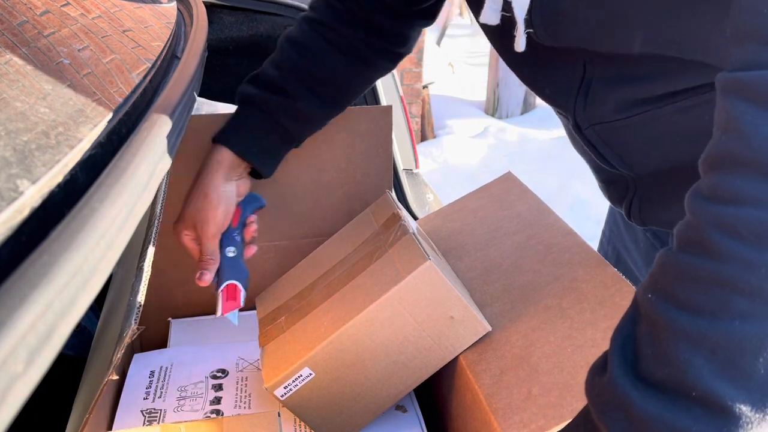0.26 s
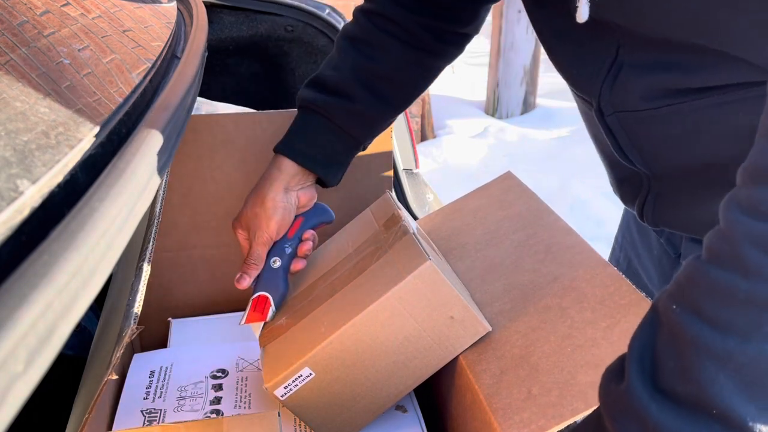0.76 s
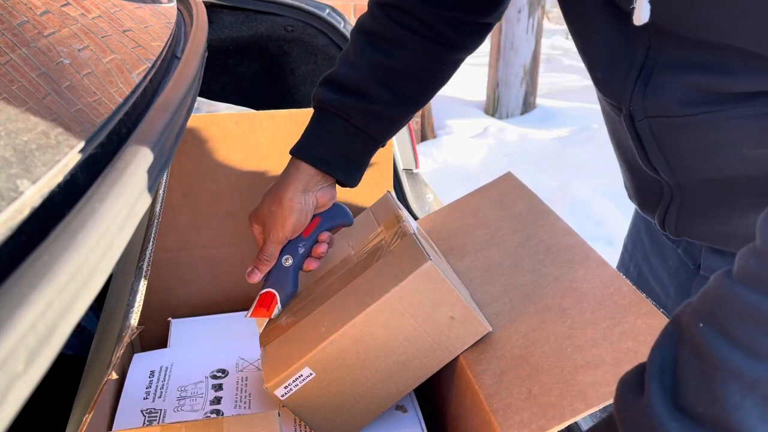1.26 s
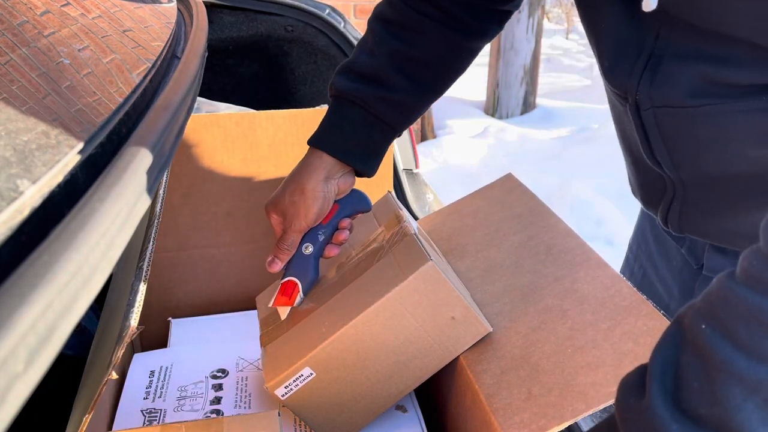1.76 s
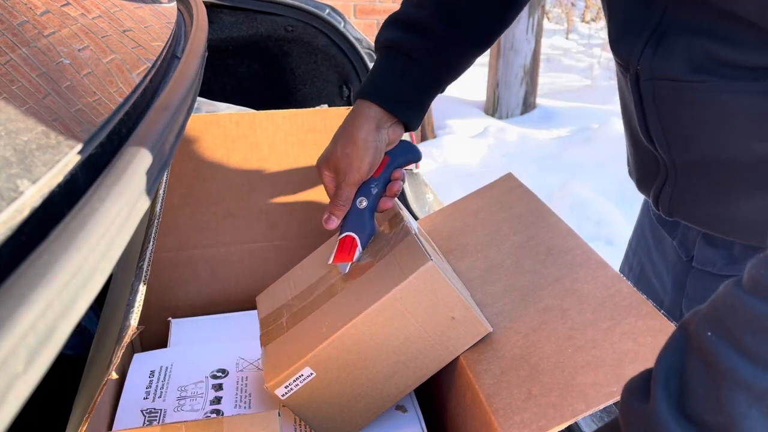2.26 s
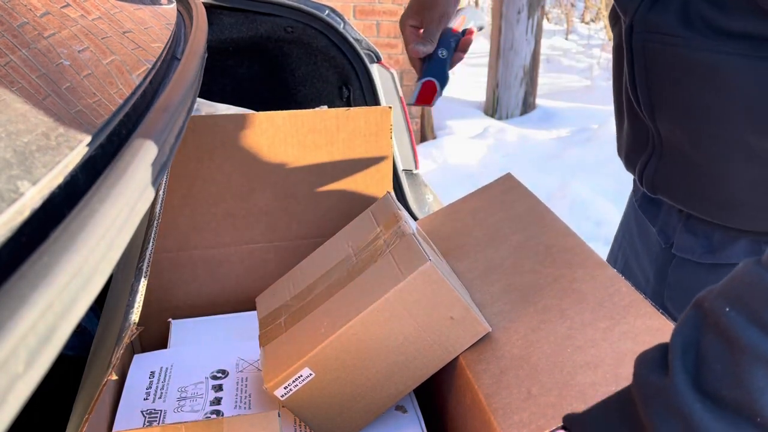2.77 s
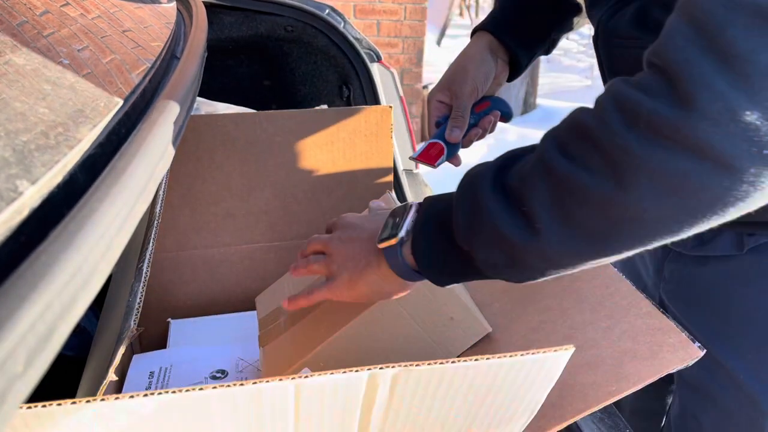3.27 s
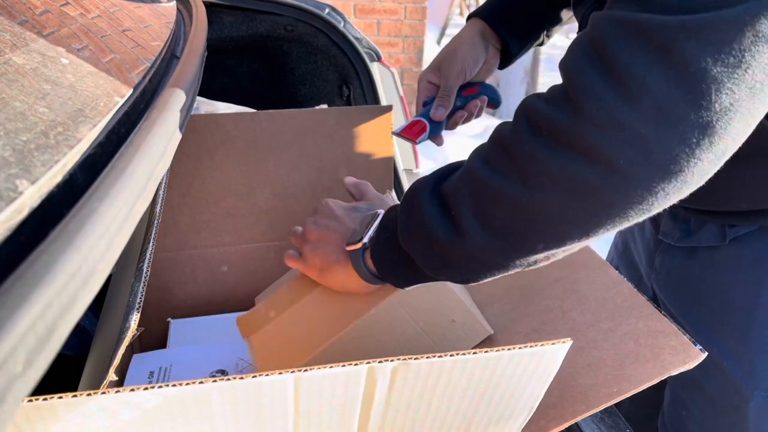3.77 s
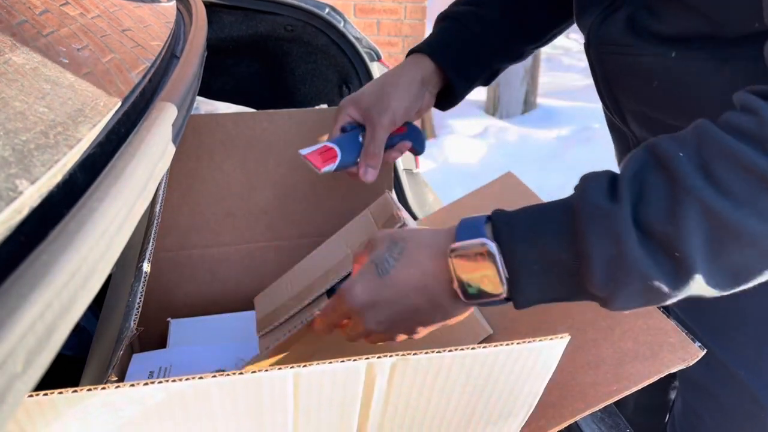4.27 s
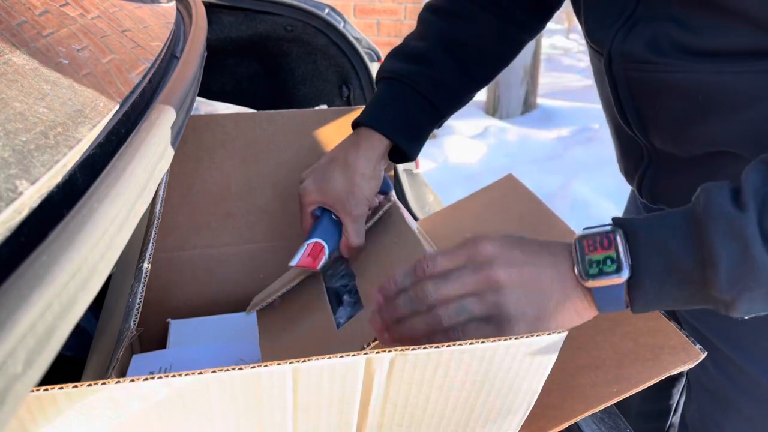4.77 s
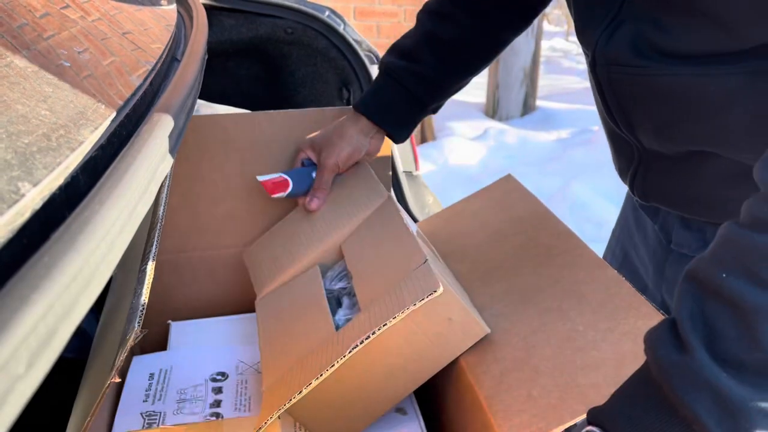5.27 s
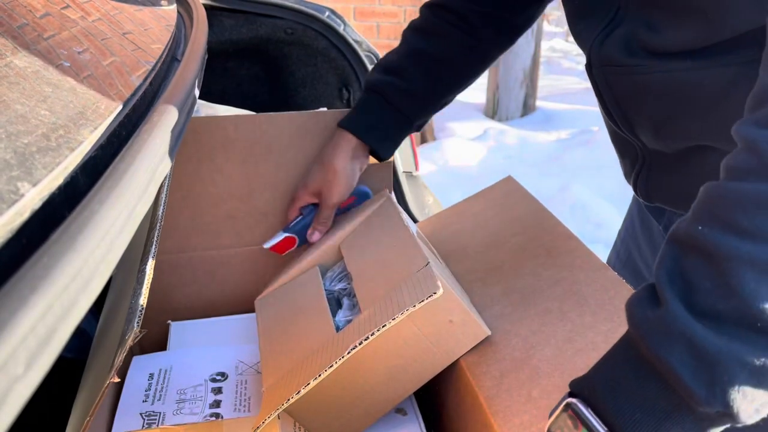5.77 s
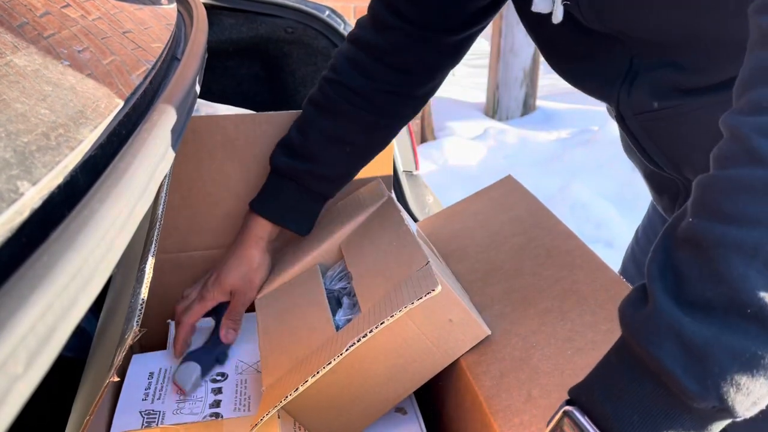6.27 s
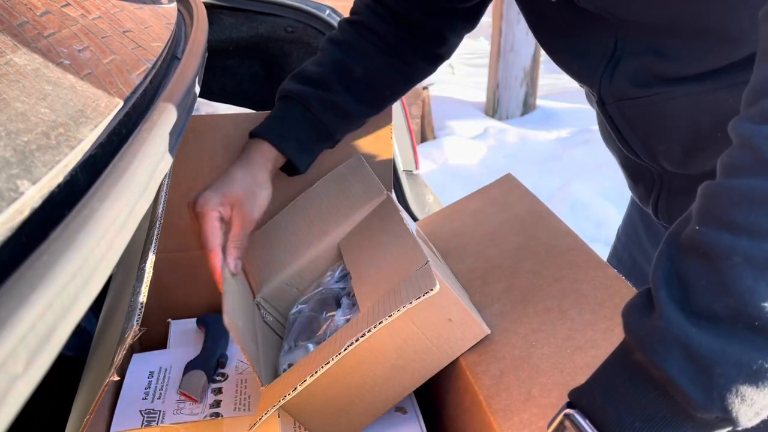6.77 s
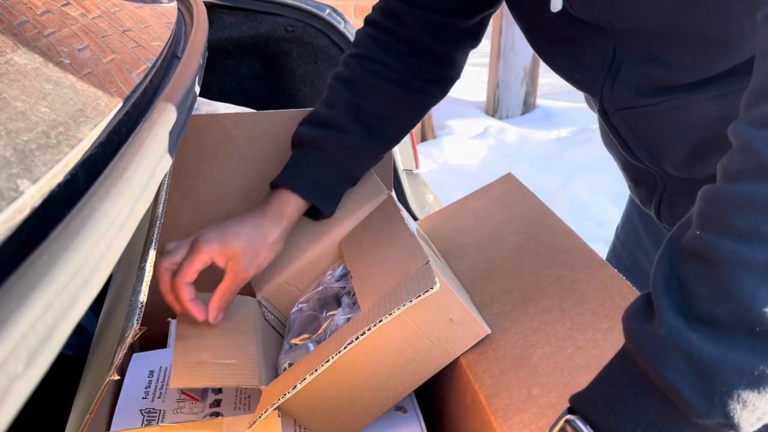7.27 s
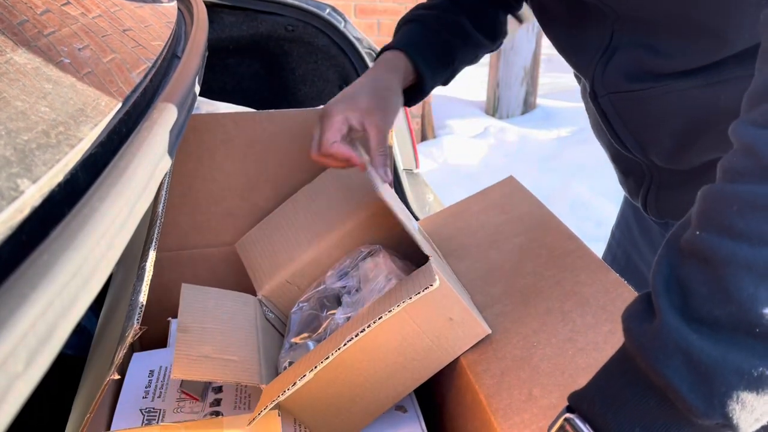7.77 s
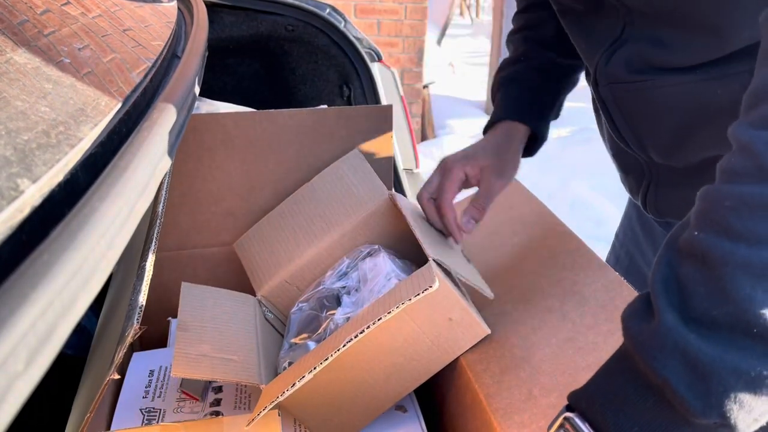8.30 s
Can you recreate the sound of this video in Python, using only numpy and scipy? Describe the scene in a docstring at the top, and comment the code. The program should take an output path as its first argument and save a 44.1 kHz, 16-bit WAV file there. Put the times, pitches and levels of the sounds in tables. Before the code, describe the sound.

Close up in an open car boot on a still day, a utility knife quietly bites, then rasps through box tape with growing crackles, falling off the end in a loud hollow thump. The blade clacks back into its handle. Hands brush the board, tape snaps, flaps pop and creak, the knife is set down with a deep knock, and remaining flaps crack open.

```python
"""A utility knife slits the tape of a cardboard box in an open car boot, heard close by on a still day outdoors.
The blade rasps along the seam and drops off the end with a thump: fibres tear, and blows ring the panels.
Hands rub the board, the blade clacks back into its handle, and the flaps fold back with creaks and cracks.
Noise bursts make the friction and cracks, decaying modes the blows, gliding tones the judders and zips.
Boot walls scatter the handling to both sides, over quiet air, into a pair of resonant microphone ports."""
import sys
import numpy as np
from scipy import signal
from scipy.fft import rfft, irfft, next_fast_len
from scipy.io import wavfile
from scipy.ndimage import uniform_filter1d

SR = 44100
rng = np.random.default_rng(int(sys.argv[2]) if len(sys.argv) > 2 else 0)


def put_to_file(sound):
    """Save the sound as 16-bit audio at rate SR, in the file named by the first command-line argument."""
    columns = np.atleast_2d(sound).T  # one column per channel
    safe = np.clip(columns, -1, 1)
    whole_steps = np.round(safe * 32767)
    wavfile.write(sys.argv[1], SR, whole_steps.astype(np.int16))


N = 376613
TIME = np.arange(N) / SR
CUTOFF_HZ = 16200  # top of what the microphones pass

# Blows on the box. Each row: time in s, level in dB, hard-contact share in dB,
# pitch of the struck spot in Hz, panel ring in dB (low where a hand damps it).
KNOCKS = [(.068, -21, -8.5, 165, -14), (0.333, -43.5, -28, 83, 14), (0.547, -40, 1.5, 146, -2),
          (1.743, -25.5, 1.5, 390, -19), (2.4819, -1.5, -10.5, 163, -4), (2.535, -32.5, -24, 76, -3.5),
          (3.316, -22.5, 0.5, 231, -15), (3.5, -27.5, 1.5, 268, -1), (3.66, -29, 5.5, 323, -8),
          (3.824, -28.5, -4.5, 469, -6), (4.002, -33.5, 6.5, 636, 3), (4.271, -35, -3.5, 126, 1),
          (4.527, -29.5, -17, 462, 10), (4.564, -7.5, -2, 302, 1), (4.576, -17.5, -4, 273, 1),
          (4.698, -31.5, -9, 150, -6), (4.786, -40, -16, 220, 3), (4.904, -37, -12, 330, 5),
          (4.999, -33.5, 3, 281, 0), (5.056, -19.5, -10, 340, -4), (5.09, -21, -22, 140, -8),
          (5.11, -19, -9.5, 172, -3), (5.221, -26.5, -11.5, 141, -1), (5.306, -26.5, -25, 453, -14),
          (5.368, -23.5, -26, 378, -11), (5.525, -37.5, -8, 107.4, -4), (5.679, -24, -25, 298, -3),
          (5.826, -24, 7, 540, -9), (5.843, -27, -20, 295, 15), (5.945, -19.5, 0, 120.5, -11),
          (6.04, -31, -2, 455, -6), (6.2324, -19.5, 11, 601, -1), (6.241, -28, 5, 650, -6),
          (6.243, -3.5, -33, 146, 0), (6.306, -6.5, -5, 227, -8), (6.32, -19, -32.5, 84.7, 6),
          (6.426, -18.5, 2, 164, 8), (6.491, -39, 8, 693, 7), (6.506, -20.5, -11, 127, -16),
          (6.529, -26, 3.5, 108, -22), (6.598, -37, 4, 600, 5), (7.042, -27, 1.5, 131.6, 3.5),
          (7.465, -21.5, 4, 857, 8), (7.556, -26, -1, 187, -12), (8.13, -13.5, -3.5, 279, -6)]
# Paper fibres giving way. Each row: frequency in Hz, relative level in dB.
CRACK_PAPER = [(1000, -10.5), (1900, -7), (2900, -0.5), (4500, -9), (7000, -20.5)]


def amp(db):
    """Decibels to gain."""
    return 10 ** (np.asarray(db) / 20)


def rms_one(x):
    """Scale to unit rms."""
    return x / np.sqrt(np.mean(x ** 2) + 1e-20)


def in_time(rows):
    """The columns of a curve at every sample."""
    s, *columns = np.transpose(rows)
    return [np.interp(TIME, s, column) for column in columns]


def during(rows):
    """One while a curve lasts, with short fades."""
    inside = (TIME >= rows[0][0]) & (TIME <= rows[-1][0])
    return uniform_filter1d(1. * inside, size=400)


def at_hz(points, hz, axis=1):
    """Read a column of a spectrum on a log-frequency axis."""
    points = np.array(points)
    return np.interp(np.log(hz + 1), np.log(points[:, 0]), points[:, axis])


def colour(x, spectrum):
    """Filter by a smooth spectrum."""
    size = next_fast_len(len(x))
    gain = amp(at_hz(spectrum, np.fft.rfftfreq(size, 1 / SR)))
    return irfft(rfft(x, size) * gain, size)[:len(x)]


def band(x, low_hz, high_hz):
    """Causal band-pass."""
    return signal.sosfilt(signal.butter(2, [low_hz, high_hz], "band", fs=SR, output="sos"), x)


def resonate(x, hz, q):
    """What passes through one resonance."""
    return signal.lfilter(*signal.iirpeak(hz, q, fs=SR), x + 1e-18)


def drift(rate):
    """Random wander through `rate` points a second, of spread one, kept within two spreads."""
    return np.clip(rms_one(np.interp(TIME * rate, np.arange(4000), rng.standard_normal(4000))), -2, 2)


def swell(peak_s, rise_s, fall_s):
    """Gain of a movement that gathers speed and dies away, 20 dB down one rise before and one fall after."""
    gain = np.zeros(N)
    near = slice(*np.searchsorted(TIME, [peak_s - 3 * rise_s, peak_s + 3 * fall_s]))
    away = np.maximum((peak_s - TIME[near]) / rise_s, (TIME[near] - peak_s) / fall_s)
    gain[near] = amp(-20 * away ** 1.51)
    return gain


def add(out, s, sound):
    """Mix a sound in at a time."""
    start = max(round(s * SR), 0)
    out[start:start + len(sound)] += sound[:N - start]


def bend(x, lag):
    """Bending waves in board travel as the root of frequency: lows arrive late (lag in s at 1 kHz)."""
    hz = np.fft.rfftfreq(len(x), 1 / SR)
    return irfft(rfft(x) * np.exp(-4j * np.pi * lag * np.sqrt(1000 * hz)), len(x))


def friction(spectrum, per_s, spread_db, smooth, uneven_db, uneven_rate):
    """Fibres catch and let go: clumps of slips of uneven size over a smooth rub; rms one."""
    sizes = amp(spread_db * np.minimum(rng.exponential(1, N), 4.5)) * rng.choice([-1, 1], N)
    slips = rms_one(sizes * (rng.random(N) < per_s / SR))
    grip = amp(uneven_db * drift(uneven_rate))
    return rms_one(colour((slips + smooth * rng.standard_normal(N)) * grip, spectrum))


def crackle(spectrum, per_s, spread_db, q, count=18):
    """Each breaking fibre rings for a few cycles at one of `count` pitches; rms one."""
    out = 0
    for hz in np.linspace(1200, 12500, count):
        breaks = np.zeros(N)
        at = rng.integers(0, N, size=int(per_s / count * N / SR))
        sizes = amp(spread_db * np.minimum(rng.exponential(1, len(at)), 3))
        breaks[at] = sizes * rng.choice([-1, 1], len(at))
        out = out + rms_one(resonate(breaks, hz, q))
    return rms_one(colour(out, spectrum))


def panel(x, depth_db=3.5, count=240):
    """Board rings with many close modes, which ripple the spectrum; rms one."""
    ripple = [np.geomspace(600, 16000, count), rng.normal(0, depth_db, count)]
    return rms_one(colour(x, np.transpose(ripple)))


def travel(x, depth_db=8.5, moves_per_s=11, handover_db=12, count=5):
    """As the contact moves over the board, one set of modes takes over from another; rms one."""
    shares = np.array([amp(handover_db * drift(moves_per_s)) for _ in range(count)])
    hz = np.geomspace(200, 14000, num=110)
    spots = []
    for _ in range(count):
        ripple = np.transpose([hz, rng.normal(0, depth_db, len(hz))])
        spots.append(rms_one(colour(x, ripple)))
    return rms_one(np.sum(shares * spots, axis=0) / shares.sum(axis=0))


def outdoor_air():
    """Quiet outdoor air: one steady noise shared by both sides, a fainter one opposed between them."""
    # Each row: frequency in Hz, relative level in dB.
    air_spectrum = [(20, -16.5), (55, -0.5), (120, -10), (300, -11.5), (800, -15), (1600, -26), (4000, -56),
                    (9000, -44), (12000, -57.5), (15000, -61.5)]
    mid, side = (rms_one(colour(rng.standard_normal(N), air_spectrum)) for _ in range(2))
    return amp(-57.0) * mid + amp(-62.5) * side * np.array([[1], [-1]])


def tape(rasp_db=-3, grains_db=-2, fibres_db=-16):
    """Blade or pull parts the tape in tiny tears, pops paper fibres and drives the panel beneath."""
    # Force of the blade along the seam, building until it drops off the end.
    # Each row: time in s, tearing level in dB.
    cut = [(1.17, -73), (1.4, -65.5), (1.56, -55), (1.77, -49), (1.96, -38), (2.345, -36.5), (2.39, -29.5),
           (2.475, -24.5), (2.52, -63.5)]
    # Short tears, as the blade bites or a flap is pressed or pulled; the first row mostly sets the # board
    # droning under the opening rub of a hand. # Each row: peak in s, rise in s, fall in s, tearing level in dB,
    # board drone in dB.
    rips = [(.01, 0.054, 0.12, -61, -38), (1.37, 0.13, 0.018, -53, -46.5),
            (1.459, 0.028, 0.033, -47, -42.5), (1.533, 0.035, 0.034, -41, -38.5),
            (1.567, 0.01, 0.022, -46, -40.5), (1.672, 0.014, 0.0077, -40.5, -36),
            (1.916, 0.0069, 0.0077, -36, -43), (1.947, 0.016, 0.039, -39, -48),
            (1.996, 0.01, 0.026, -48, -33.5), (2.056, 0.0067, 0.031, -39, -47.5),
            (2.097, 0.0069, 0.064, -43.5, -39.5), (2.184, 0.023, 0.0069, -32, -32.5),
            (2.221, 0.016, 0.0071, -35, -30), (2.253, 0.008, 0.0059, -32, -30.5),
            (2.369, 0.0033, 0.015, -37.5, -29.5), (2.385, .003, .009, -25, -25.5),
            (2.401, .003, .009, -39, -26.5), (2.426, 0.0049, 0.0089, -29, -28.5),
            (2.458, 0.0064, 0.024, -25.5, -29.5), (2.475, 0.013, 0.0086, -42, -21.5),
            (3.626, 0.023, 0.028, -38, -33), (4.02, 0.047, 0.066, -45, -37),
            (4.142, 0.065, 0.042, -54, -58), (6.594, 0.0073, 0.013, -27.5, -37.5),
            (7.015, 0.048, 0.059, -35, -38.5), (8.0, 0.094, 0.13, -39, -44),
            (8.078, 0.044, 0.064, -22.5, -36.5)]
    # Tearing tape, then the droning panel. Each row: frequency in Hz, relative level in dB.
    rasp_spectrum = [(900, -36), (1600, 2.5), (2100, -4.5), (2600, 3.5), (4000, -0.5), (6000, -1.5),
                     (8000, 7), (11500, 10), (15000, -8)]
    drone_spectrum = [(40, -11), (105, 5.5), (160, 1.5), (230, 1), (380, 6), (450, -1.5), (510, 10),
                      (620, -2), (760, 6), (880, 6), (1020, -1), (1140, 5.5), (1500, -6), (2500, -19.5)]
    rasp = travel(friction(rasp_spectrum, per_s=3200, spread_db=-8.5, smooth=1.0,
                           uneven_db=-0.5, uneven_rate=98))
    grains = crackle(rasp_spectrum, per_s=1100, spread_db=2, q=5)
    fibres = friction(CRACK_PAPER, per_s=370, spread_db=3.5, smooth=0.096, uneven_db=6.0, uneven_rate=67)
    drone = friction(drone_spectrum, per_s=600, spread_db=2, smooth=0.84, uneven_db=1.6, uneven_rate=69)
    drone = travel(drone, depth_db=5.5)

    # the tear snags and runs free about 45 times a second, and jerks between snags
    snags = np.cumsum(45 * (1 + .4 * drift(30))) / SR
    snag_db = 3 * uniform_filter1d(.5 - snags % 1, size=120)
    bite = amp(snag_db + 1.5 * drift(240))

    force_db, = in_time(cut)
    tearing = during(cut) * amp(force_db)
    driving = during(cut) * amp(-0.5 + 0.87 * force_db)  # the panel follows most of the force's swing
    for s, rise, fall, tear_db, board_db in rips:
        pull = swell(s, rise, fall)
        tearing += amp(tear_db) * pull
        driving += amp(board_db) * pull
    tear = amp(rasp_db) * rasp + amp(grains_db) * grains + amp(fibres_db) * fibres
    return bite * (tearing * tear + driving * drone)


def sliding(hiss_db=8.0, scrape_db=5.0, sway_db=4, drag_db=-4, grit_db=-1, rock_db=-38.5, rock_t60=0.66):
    """Skin, cloth and flaps rub over the board; drag, shifts and blows sway the whole box."""
    # Hands, sleeves and flaps. Each row: peak in s, rise in s, fall in s, hiss in dB, scrape in dB.
    strokes = [(0.021, 0.098, 0.16, -49.5, -57), (0.562, 0.022, 0.23, -69, -64),
               (1.073, 0.39, 0.96, -78.5, -65.5), (2.68, 0.1, 0.15, -65, -56),
               (2.867, 0.14, 0.14, -48, -77), (2.969, 0.11, 0.22, -48, -48.5),
               (3.451, 0.15, 0.42, -61.5, -62), (3.699, 0.071, 0.07, -52.5, -49.5),
               (3.909, 0.35, 0.12, -58.5, -62.5), (4.12, 0.24, 0.083, -49, -54),
               (4.359, 0.22, 0.38, -53.5, -55.5), (4.514, 0.095, 0.14, -41, -39),
               (4.863, 0.21, 0.026, -47, -51), (4.971, 0.089, 0.21, -35.5, -39.5),
               (5.362, 0.17, 0.15, -43, -60.5), (5.54, 0.15, 0.8, -64.5, -57.5),
               (5.879, 0.17, 0.27, -47.5, -49.5), (6.116, 0.0045, 0.15, -50, -74),
               (6.61, 0.071, 0.06, -50.5, -39.5), (6.698, 0.079, 0.055, -51.5, -63.5),
               (6.93, 0.31, 0.35, -47.5, -51.5), (7.19, 0.18, 0.11, -65.5, -61),
               (7.563, 0.074, 0.18, -47, -45), (7.66, 0.01, 0.032, -46, -44.5),
               (7.912, 0.59, 0.32, -56.5, -64), (8.268, 0.096, 0.055, -49.5, -56),
               (8.42, 0.14, 0.048, -48, -59.5)]
    # The whole box shifts on the boot floor. Each row: peak in s, level in dB.
    shifts = [(.02, -46), (.36, -63), (1.5, -55.5), (1.85, -45), (3.0, -48), (3.63, -49.5), (4.06, -56),
              (4.36, -67), (4.77, -58), (5.02, -49.5), (5.26, -47.5), (5.57, -58), (6.1, -56.5), (6.4, -50),
              (6.668, -58.5), (7.19, -60)]
    # Rubbed surface, its grit, the scraped board, the swaying box.
    # Each row: frequency in Hz, relative level in dB.
    hiss_spectrum = [(1000, -4), (2000, -7.5), (2800, -2), (4200, -4), (6000, -4.5), (8500, 4.5),
                     (11500, 0.5), (15000, 1.5)]
    grit_spectrum = [(1200, 2.5), (3000, -10), (6000, -3), (12000, 5.5)]
    scrape_spectrum = [(150, -3.5), (320, 3), (500, -6.5), (700, -1.5), (1000, -4), (1500, -10.5),
                       (2200, -14), (4000, -21)]
    sway_spectrum = [(20, -15.5), (40, -25.5), (60, 3.5), (110, -1), (200, -5.5), (300, -13), (500, -17),
                     (1000, -38.5)]
    hiss = panel(friction(hiss_spectrum, per_s=700, spread_db=2.0, smooth=1.36,
                          uneven_db=1.5, uneven_rate=88))
    scrape = travel(friction(scrape_spectrum, per_s=240, spread_db=3.0, smooth=0.88,
                             uneven_db=2.0, uneven_rate=70))
    sway = friction(sway_spectrum, per_s=110, spread_db=4.5, smooth=0.82, uneven_db=-3.0, uneven_rate=14)
    grit = crackle(grit_spectrum, per_s=700, spread_db=2.5, q=3.9)

    speed, pressure, rocking = np.zeros((3, N))
    for s, rise, fall, speed_db, pressure_db in strokes:
        stroke = swell(s, rise, fall)
        speed += amp(speed_db) * stroke
        pressure += amp(pressure_db) * stroke
    for s, db in shifts:
        rocking += amp(db + sway_db) * swell(s, rise_s=0.13, fall_s=0.11)
    for s, blow_db, *_ in KNOCKS:  # the box rocks on after a blow
        add(rocking, s, amp(blow_db + rock_db - 60 * TIME[:SR] / rock_t60))

    catch = amp(1.9 * drift(90))  # a stroke catches and slips, in hiss and scrape alike
    rubbing = speed * catch * (amp(hiss_db) * hiss + amp(grit_db) * grit)
    dragging = pressure * catch * (amp(scrape_db) * scrape + amp(drag_db) * sway)
    return rubbing + dragging + rocking * sway


def snaps(rise=0.00074, lead_db=-20, lead_in=0.0035, tail_db=-22, tail_t60=0.07,
          board_slower=1.7, spot_db=1, spot_q=8):
    """A crack is an avalanche of fibres: a few give first, then all, and the spot and the board ring."""
    # Tape and creases cracking. Each row: time in s, level in dB, share of paper and board in dB,
    # time in s to fall 30 dB, ring of the cracking spot in Hz.
    cracks = [(0.065, -22, -12, 0.0079, 4500), (.929, -46, -4.5, 0.004, 3760),
              (1.033, -48, -5.5, 0.013, 8050), (1.657, -27, -43, .017, 11100),
              (1.734, -25, -21.5, 0.018, 800), (1.796, -23.5, -14, 0.012, 11200),
              (1.822, -23.5, -9, 0.025, 610), (1.8755, -22.5, -10.5, 0.013, 11160),
              (1.743, -27, -9, .012, 990), (1.91, -29, -17, 0.013, 900), (1.957, -27.5, -12, 0.0052, 8500),
              (1.97, -27.5, -11.5, .008, 11000), (1.99, -31.5, -26, .01, 9000),
              (2.001, -23, -24, .008, 11000), (2.05, -29.5, -18, .012, 8100),
              (2.1845, -24.5, -8.5, .012, 2600), (2.208, -33, -5, 0.014, 670),
              (2.22, -24, -15.5, 0.0089, 7800), (2.27, -16, -8, 0.011, 597), (3.313, -26.5, -8, .025, 885),
              (3.362, -42, -16, 0.034, 9150), (3.487, -30.5, -16, 0.0043, 9200),
              (3.603, -21.5, -11, 0.0072, 10600), (3.631, -21, -16, 0.0039, 900),
              (3.662, -23, -9, 0.027, 2300), (3.825, -26, -7, 0.0053, 4680),
              (3.973, -27, -14, 0.017, 11600), (4.003, -37, -1, 0.02, 6200),
              (4.027, -17.5, -26, 0.031, 6850), (4.105, -26.5, -8.5, 0.015, 1150),
              (4.147, -36.5, -5, 0.026, 1150), (4.414, -25.5, -21, .0081, 9700),
              (4.429, -15.5, -2.5, 0.0078, 10340), (4.4525, -4.5, -10.5, 0.015, 4240),
              (4.456, -9, -10, 0.0089, 1860), (4.692, -31, -9, 0.025, 9400), (5.075, -28, 1, 0.013, 9800),
              (5.306, -15, -12.5, 0.042, 4770), (5.3718, -4, -15, 0.0054, 7550),
              (5.421, -23, -14, .04, 2780), (6.2393, -9.5, -7, 0.02, 1140), (6.3054, -17, -9, 0.031, 1880),
              (6.425, -32, -4, 0.019, 600), (6.5168, -28.5, -11.5, 0.0069, 9430),
              (6.5236, -31.5, 2, 0.027, 9500), (6.584, -22.5, -8, 0.012, 7550),
              (6.826, -21.5, -9, 0.045, 10540), (6.8298, -22.5, -10, 0.0048, 3500),
              (6.9053, -17, -13, 0.0054, 11350), (7.007, -13, -15.5, 0.005, 10900),
              (7.0246, -3, -10, 0.0082, 3100), (7.038, -19.5, -3, 0.011, 11300),
              (7.467, -26.5, -2, 0.044, 880), (7.552, -27, -4.5, 0.023, 1050),
              (7.765, -13.5, -10.5, 0.0044, 11800), (7.869, -24, -28, 0.007, 8870),
              (7.9763, -20.5, -2, 0.012, 11600), (8.009, -12.5, -4.5, 0.0062, 11300),
              (8.027, -14.5, -8.5, 0.01, 2260), (8.0647, -8, -7.5, 0.01, 4230),
              (8.094, -15, -10.5, .015, 2600), (8.105, -16, -12.5, .006, 8900),
              (8.1128, -13, -1.5, 0.01, 10000)]
    # The board's and the tape's part of a crack. Each row: frequency in Hz, relative level in dB.
    board_spectrum = [(200, -19.5), (500, -10), (900, 4), (1300, 4), (1800, -4.5), (3000, -18.5)]
    tape_spectrum = [(2500, -19), (5000, -3), (7800, 4), (9500, 3.5), (11500, 2.5), (15500, 4)]
    out, before = np.zeros(N), .02  # s of lead-in ahead of the crack
    t = np.arange(5120) / SR - before
    after = np.maximum(t, 0)
    for s, level_db, body_db, length, spot_hz in cracks:
        parts = [(tape_spectrum, -14, length),
                 (CRACK_PAPER, body_db - 17.5, length),
                 (board_spectrum, body_db - 15.5, length * board_slower)]
        crack = 0
        for spectrum, part_db, fall_30db in parts:
            decay = amp(-30 * after / fall_30db) + amp(tail_db - 60 * after / tail_t60)
            first_fibres = amp(lead_db) * np.exp(-abs(t) / lead_in)
            fade = (1 - np.exp(-after / rise)) * decay + first_fibres
            crack = crack + amp(part_db) * rms_one(colour(rng.standard_normal(len(t)) * fade, spectrum))
        crack = crack + amp(spot_db) * resonate(crack, spot_hz, spot_q)
        add(out, s - before - .001, amp(level_db - 3.0) * bend(crack, lag=0.001248))
    return out


def knocks(direct=2.65, spot_db=-4, spot_t60=0.12, focus_db=4, edge_db=-11, edge_s=0.015, deep_hz=130,
           hard_hz=540, soft_hz=1350, crush_db=-5, crush_t60=0.059, buzz_db=-26):
    """A blow sends a falling chirp across the board, back from its edges and into the nearest panel modes."""
    # Modes of the box. Each row: frequency in Hz, level in dB, t60 in s.
    panel_modes = [(59.6, -9, 0.26), (76, -20, 0.12), (109, -11.5, 0.22), (148.5, -4.5, 0.092),
                   (206, -4, 0.068), (252, -12.5, 0.14), (298.3, -11.5, 0.19), (509.7, -2, 0.074),
                   (650, -6, 0.05), (790, -13, 0.05), (885, -18, 0.067), (1150, -21.5, 0.065)]
    out, t = np.zeros(N), np.arange(16384) / SR
    contact = signal.butter(3, soft_hz, fs=SR, output="sos")
    for s, level_db, hard_db, spot_hz, ring_db in KNOCKS:
        ring = 0
        for hz, db, t60 in list(panel_modes) + [(spot_hz, spot_db, spot_t60)]:
            strength_db = db - focus_db * abs(np.log2(hz / spot_hz)) + rng.normal(0, 2.5)
            mode_hz = hz * (1 + rng.normal(0, .025))
            ring = ring + amp(strength_db - 60 * t / t60) * np.cos(2 * np.pi * mode_hz * t)

        turns = spot_hz * t
        push = direct * np.exp(-turns / 0.62) * np.cos(2 * np.pi * turns)  # the spot gives way for about one swing
        flutes = rms_one(band(rng.standard_normal(len(t)), 280, 2800))  # they give under the contact
        wave = amp(ring_db) * ring + push + amp(crush_db - 60 * t / crush_t60) * flutes
        if_delays = rng.uniform(0.00082, edge_s, size=4)
        for delay, sign in zip(if_delays, rng.choice([-1, 1], size=4)):
            echo = np.pad(push, (round(delay * SR), 0))[:len(t)]
            wave = wave + sign * amp(edge_db) * echo
        blow = signal.sosfilt(contact, bend(wave, lag=0.00291))

        deep_db = 0.5 - 9 * np.log2(spot_hz / deep_hz)  # stiffer, higher spots boom less
        deep = amp(deep_db - 24.5) * rms_one(band(band(blow, 53, deep_hz), 53, deep_hz))
        body = amp(-22.5) * rms_one(band(blow, 95, hard_hz))
        hard = amp(hard_db - 24.0) * rms_one(band(band(blow, hard_hz, 1600), hard_hz, 1600))
        rattle = rms_one(band(rng.standard_normal(len(t)), 450, 1800))
        buzz = amp(buzz_db) * np.maximum(deep + body, 0) * rattle  # loose flaps rattle on each swing
        add(out, s - .0032, amp(level_db) * (deep + body + hard + buzz))
    return out


def scuffs(width=0.21, chatter_db=5):
    """A papery edge catches on another, chatters around one pitch and lets go."""
    # Each row: start in s, length in s, level in dB, pitch in Hz.
    edges = [(0.395, 0.0075, -57, 3000), (2.641, 0.022, -50, 1920), (0.537, 0.17, -54.5, 910),
             (3.868, 0.036, -45.5, 2050), (3.875, 0.032, -51, 4500), (4.007, 0.14, -37, 1100),
             (3.993, 0.1, -44.5, 2130), (4.144, 0.013, -30, 1130), (4.804, 0.11, -49.5, 2740),
             (5.275, 0.062, -41.5, 2666), (5.956, 0.14, -41, 486), (6.518, 0.029, -39, 1200),
             (6.576, 0.058, -35, 890), (6.926, 0.18, -42, 336), (7.344, 0.026, -57.5, 3330),
             (7.462, 0.032, -34, 915), (7.572, 0.035, -35, 3620), (7.655, .035, -46, 780),
             (7.118, 0.064, -52, 1100), (8.078, 0.092, -32, 660), (8.401, 0.05, -42, 1440)]
    out = np.zeros(N)
    chatter = rng.standard_normal(N) * amp(chatter_db * drift(250))
    for s, length, db, hz in edges:
        along = np.clip((TIME - s) / length, 0, 1)
        stroke = 2 * np.sqrt(along) * (1 - along)
        out += amp(db) * stroke * rms_one(band(chatter, hz / (1 + width), hz * (1 + width)))
    return out


def skate(chatter_db=3, octave_db=-17):
    """Blade tip or fingertip skates along the tape: a rough zip whose pitch follows the slide's speed."""
    # Each row: width as a share of the pitch, then a curve of (time in s, pitch in Hz, level in dB).
    zips = [(.09, [(.55, 2770, -64), (.68, 2574, -72), (.77, 2300, -69), (.85, 2220, -63), (.97, 2180, -84),
            (1.2, 2400, -75)]), (.13, [(4.02, 10100, -42), (4.05, 9000, -31.5), (4.075, 7030, -36),
            (4.097, 5270, -38), (4.112, 3680, -49)]), (.2, [(7.572, 5720, -46), (7.585, 7170, -23),
            (7.594, 8570, -21), (7.6, 9200, -32)])]
    out, chatter = 0, rng.standard_normal(N) * amp(chatter_db * drift(200))
    for width, curve in zips:
        hz, db = in_time(curve)
        mean_hz = np.mean(curve, axis=0)[1]
        blur = rms_one(band(chatter, 30, width * mean_hz))
        turn = 2 * np.pi * np.cumsum(hz) / SR
        octave = amp(octave_db) * (2 * hz < CUTOFF_HZ) * np.sin(2 * turn)
        out = out + during(curve) * amp(db) * blur * (np.sin(turn) + octave)
    return out


def retract(rise=0.001, t60=0.012, tail_db=-22, tail_t60=0.067, slide_s=0.013, slide_db=-23):
    """The blade slides back into its handle and hits the stop: a brief slide, then a dry plastic clack."""
    # Ring of the handle. Each row: frequency in Hz, relative level in dB.
    handle_spectrum = [(1200, -26), (1700, 0.5), (2150, 5), (2500, -5.5), (4200, -4.5), (6000, -8.5),
                       (7700, 6.5), (9500, 0), (11500, -2), (15500, 3.5)]
    out, t = np.zeros(N), TIME[:5120] - slide_s
    after = np.maximum(t, 0)
    decay = amp(-60 * after / t60) + amp(tail_db - 60 * after / tail_t60)
    clack = (1 - np.exp(-after / rise)) * decay
    force = clack / clack.max() + amp(slide_db) * (t < 0)
    sound = rms_one(colour(rng.standard_normal(len(t)) * force, handle_spectrum))
    add(out, 2.7542 - slide_s, amp(-20) * sound)
    return out


def ticks(t60=0.018, q=2.4, rise=.0005):
    """Fingernails and loose tape ends tick: a tiny burst of slips, ringing around one pitch."""
    # Each row: start in s, level in dB, pitch in Hz.
    taps = [(3.051, -32, 11000), (3.571, -35, 6900), (3.583, -35, 9900), (3.6794, -41, 2380),
            (3.812, -34.5, 7440), (3.954, -30.5, 10600), (4.156, -28.5, 10900), (4.613, -37.5, 2380),
            (4.76, -36, 9250), (5.213, -36.5, 9200), (6.5082, -29.5, 9100), (6.553, -31, 7570),
            (6.6146, -31, 7680), (6.647, -30.5, 6960), (6.7993, -34, 11200), (6.843, -25, 11050),
            (6.867, -37, 9000), (6.971, -36, 3500), (7.5015, -28.5, 7800), (7.541, -31, 7500),
            (7.75, -31, 9200), (8.425, -33.5, 8440)]
    out, t = np.zeros(N), TIME[:2048]
    fade = (1 - np.exp(-t / rise)) * amp(-60 * t / t60)
    for s, level_db, hz in taps:
        burst = resonate(rng.standard_normal(len(t)) * fade, hz, q)
        add(out, s, amp(level_db - 16) * rms_one(burst))
    return out


def judder():
    """A flap sticks and slips at its lowest note under the knife handle or a hand."""
    # One curve per judder. Each row of a curve: time in s, pitch in Hz, level in dB.
    flap_curves = [
        [(4.9, 104.3, -46), (4.985, 95, -40.5), (5.03, 85, -45)],
        [(5.93, 97.4, -38), (5.962, 103.4, -24), (6.0, 90.4, -28), (6.05, 112.6, -31.5), (6.1, 99, -43)],
        [(6.62, 58.1, -37.5), (6.652, 65.4, -35), (6.72, 65.5, -47)],
    ]
    out = 0
    for curve in flap_curves:
        hz, db = in_time(curve)
        turn = 2 * np.pi * np.cumsum(hz * (1 + 0.04 * drift(60))) / SR
        level = during(curve) * amp(db + 1.5 + 4.2 * drift(70))
        out = out + level * (np.sin(turn) + 0.11 * np.sin(2 * turn))
    return out


def boot(x, t60=0.042, moves_per_s=30, count=4):
    """Close walls scatter sound differently to the two sides, and the spread flickers."""
    # Sound scattered by the boot walls. Each row: frequency in Hz, side to mid in dB.
    scatter = [(60, -17), (300, -23.5), (700, -12.5), (1300, -25), (2200, -10), (5000, -15.5), (8500, -25),
               (15000, -29)]
    t = np.arange(2048) / SR
    shares = np.array([drift(moves_per_s) for _ in range(count)])
    side = 0
    for share in shares / np.linalg.norm(shares, axis=0):
        echoes = rfft(rng.standard_normal(len(t)) * amp(-60 * t / t60))
        echoes /= np.sqrt(uniform_filter1d(abs(echoes) ** 2, size=7))  # even out the spectrum
        side = side + share * signal.oaconvolve(x, irfft(echoes))[:N]
    side = colour(side, scatter)
    return np.array([x + side, x - side])


def scene():
    """All the handling in the boot, over quiet outdoor air that differs a little between the sides."""
    handling = tape() + sliding() + snaps() + knocks() + scuffs() + skate() + retract() + ticks() + judder()
    return boot(handling) + outdoor_air()


def record(dry):
    """Two microphone ports ring near 10 kHz, out of step; peaks are rounded and the top is cut."""
    # Each row: frequency in Hz, resonance in dB, left minus right in dB, left phase lead in rad.
    port_response = [(95, 0.5, 0.5, -0.15), (275, -1.5, 1.1, 0.01), (1460, -5.5, 0.5, 0.74),
                     (2520, 0, 5, 1.08), (2940, -1.5, 3, 1.37), (4050, -1, 4.5, 1), (6060, -1.5, 3, 0.66),
                     (7400, -2, 2.5, 1.34), (8610, -2.5, 0, -0.45), (10530, 8.5, 0, -3.5),
                     (11000, 1.5, 1.5, -4.5), (12180, -7, -4.5, -8), (15000, -32.5, 7, -8.5),
                     (15700, -17.5, -4, -10.5)]
    size = next_fast_len(N + 2048)
    hz = np.fft.rfftfreq(size, 1 / SR)
    # each side takes half of the difference
    lean = amp(at_hz(port_response, hz, axis=2) / 2) * np.exp(.5j * at_hz(port_response, hz, axis=3))
    ports = amp(at_hz(port_response, hz)) * np.array([lean, 1 / lean])
    heard = irfft(rfft(dry, size) * ports, size)[:, :N]
    overload = .9  # ceiling the rounded peaks approach, of full scale
    heard = heard / (1 + (heard / overload) ** 4) ** .25
    return signal.sosfilt(signal.cheby2(12, 70, CUTOFF_HZ + 1000, fs=SR, output="sos"), heard)


dry = scene()
out = record(dry)
put_to_file(out)
```